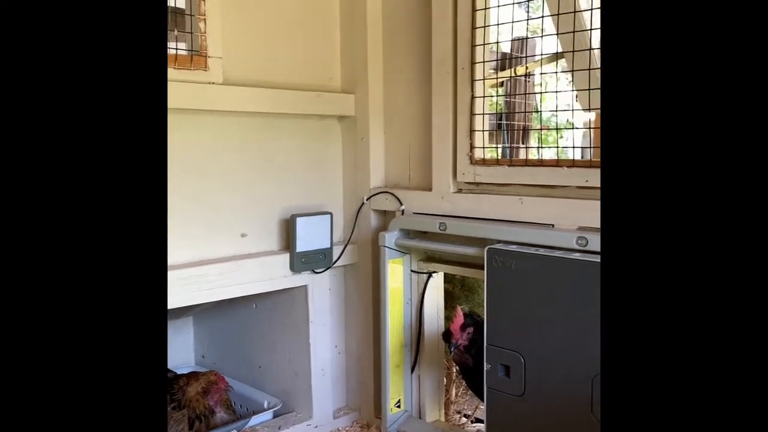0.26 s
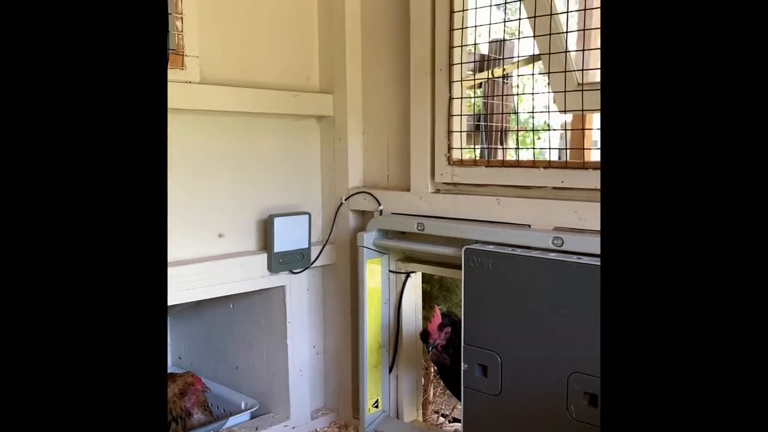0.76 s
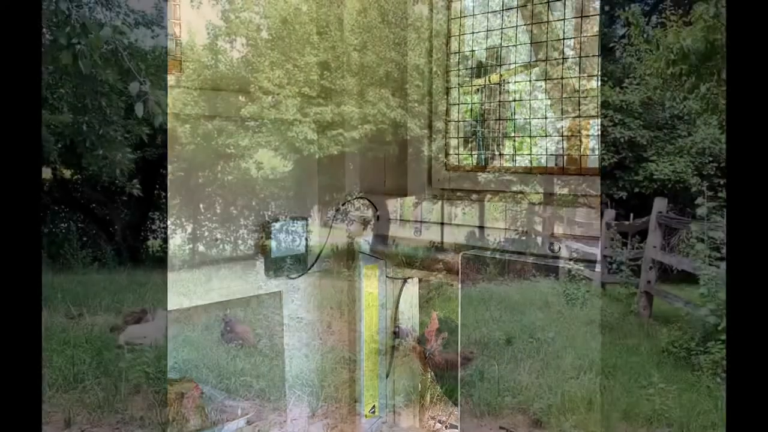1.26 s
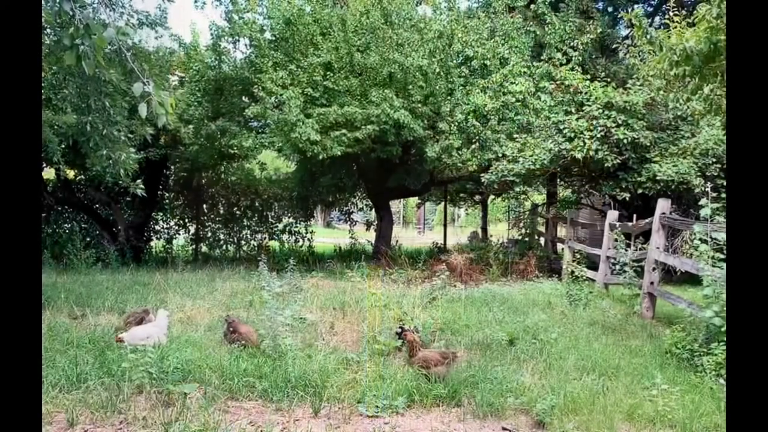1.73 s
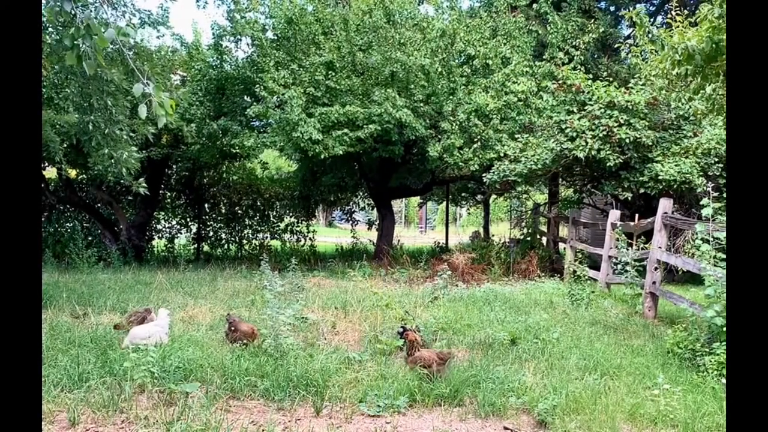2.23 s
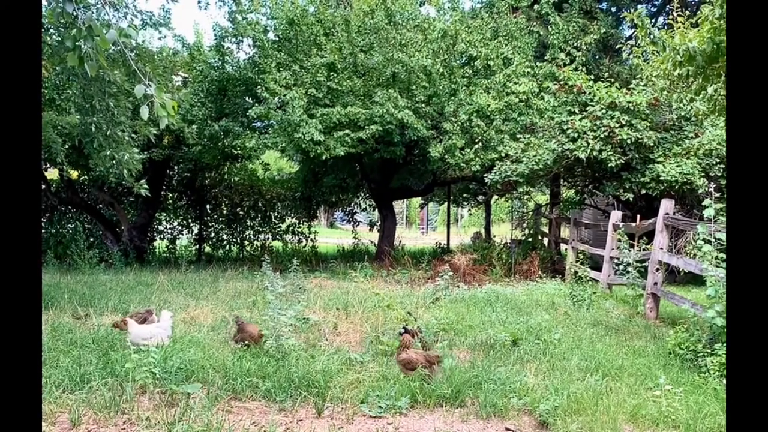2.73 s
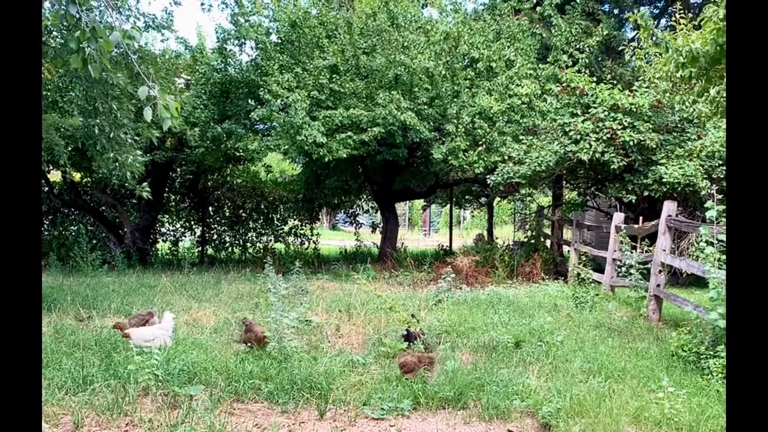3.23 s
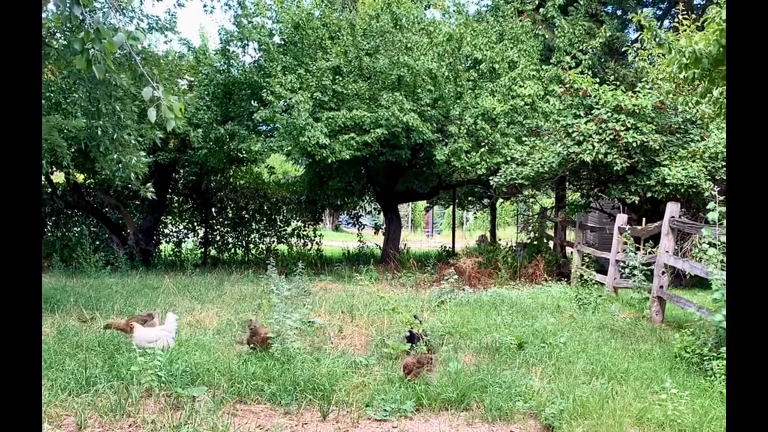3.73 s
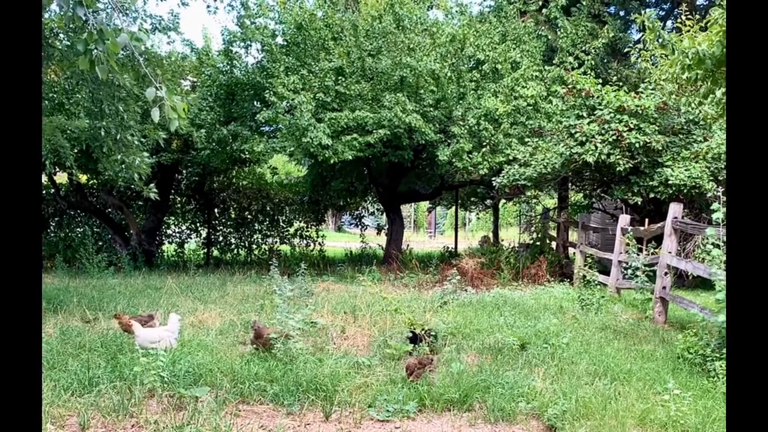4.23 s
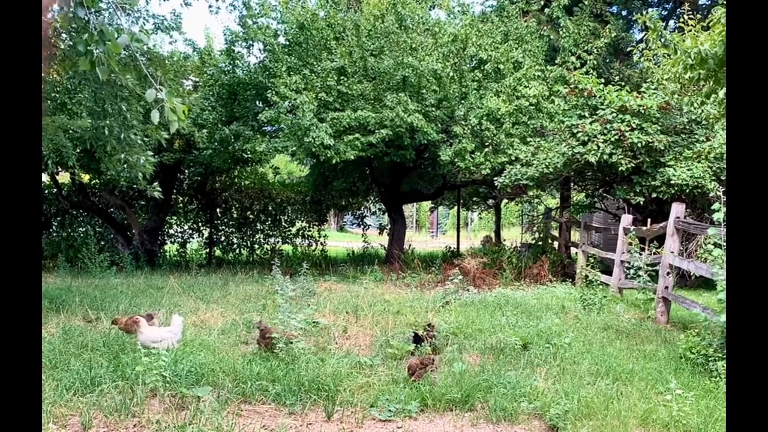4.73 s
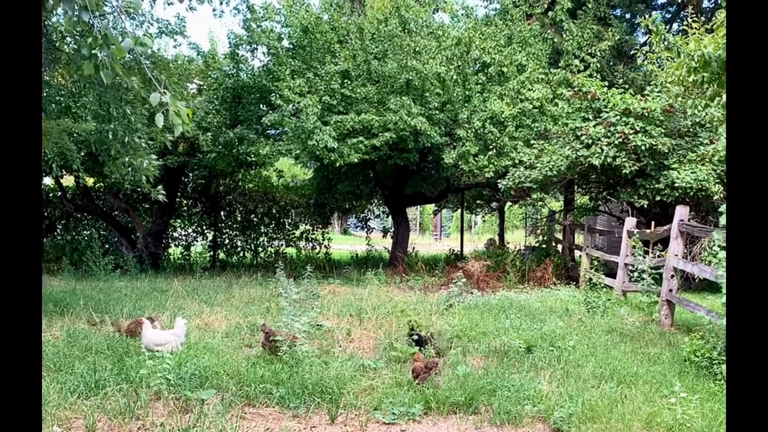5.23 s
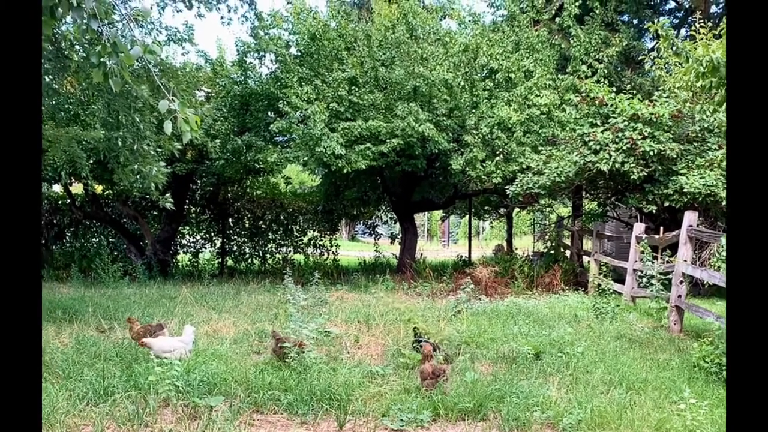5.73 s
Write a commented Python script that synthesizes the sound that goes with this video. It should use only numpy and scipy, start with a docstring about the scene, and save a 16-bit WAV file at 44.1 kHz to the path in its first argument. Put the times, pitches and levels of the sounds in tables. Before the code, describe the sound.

Outdoor birdsong with short echoes from trees: one central singer gives sharp, high down-slurs roughly twice a second, first dipping swoops, then stepped falls, then both mixed. Scattered whistles, clicks of chips and raspy calls surround it. A low drone and room tone fade early, replaced by gusty low wind, dull air bumps on the microphone and faint wide leaf hiss.

```python
"""A songbird repeats two down-slurred syllables in a tree-lined yard; other birds whistle, chip, twitter and rasp,
after a faint low hen murmur. Voices are gliding sines, shaped by a throat resonance or by pitch shake; trunks and
leaves scatter them into soft noise tails. The birds start softer, dip briefly near 0.65 s, then come up. A hen
house's low drone and noise room tone fade early. Wind is coloured noise, its bumps on the microphone decaying
low swings; air and foliage hiss faintly, as wide filtered noise."""
import sys
import numpy as np
from scipy import signal
from scipy.fft import rfft, irfft
from scipy.io import wavfile

SR = 44100
rng = np.random.default_rng(int(sys.argv[2]) if len(sys.argv) > 2 else 0)


def to_wav(sig):
    """Store sig (one row per channel, or 1-D mono) as 16-bit WAV at the path in sys.argv[1].

    Samples outside -1..1 are clipped; the rate is SR.
    """
    pcm = np.clip(np.atleast_2d(sig), -1, 1) * 32767
    pcm = np.round(pcm).astype(np.int16)
    wavfile.write(sys.argv[1], SR, pcm.T)  # frames by channels


N = 264114

# Turning points of the two syllables: t after onset/s, f/Hz
SWOOP_TURNS = [(-.005, 6050), (-.001, 6080), (.022, 3270), (.056, 3660), (.076, 3570), (.122, 2620),
               (.155, 2950)]
STEP_TURNS = [(-.004, 6400), (0, 6450), (.022, 4480), (.043, 4520), (.064, 3150), (.104, 2900)]
# Each singing: t/s, level at throat resonance/dB, length ratio, final fade/(dB per s of unstretched time)
SWOOPS_SUNG = [(0.106, -37, 0.97, 261), (0.549, -39, 0.91, 480), (1.028, -34, 0.96, 193),
               (1.443, -33.5, 0.98, 235), (3.063, -35, 0.94, 169), (3.829, -37, 0.96, 172),
               (4.234, -41, 0.9, 198)]
STEPS_SUNG = [(1.852, -35.5, 1.0, 250), (2.245, -35, 1.09, 250), (2.661, -37.5, 1.0, 250),
              (3.429, -38.5, 1.02, 250)]


def songbird(tag_after_s=.126, tag_s=.031, tag_hz=(3750, 4085, 3632), tag_db=-7.5):
    """Main singer: dipping swoops and stepped falls; each step gets a short tag that lifts, then falls."""
    swoops = syllables(SWOOP_TURNS, SWOOPS_SUNG, hold_s=0.092)
    steps = syllables(STEP_TURNS, STEPS_SUNG, hold_s=0.097)
    tag_rows = [(start + tag_after_s, tag_s, *tag_hz, db + tag_db) for start, db, *_ in STEPS_SUNG]
    # negative sag: level rises through the tag
    tags = notes(tag_rows, np.sqrt, blur=0.57, sag_db=-2, attack_s=0.018, release_s=0.0053)
    return perch(swoops + steps + tags)


def syllables(turns, sung, hold_s, attack_s=0.0039, waver=0.0073, throat_hz=3958, throat_q=7.65):
    """Syrinx eases between turning pitches; throat resonance sets loudness; effort fades after a hold."""
    out, drift = np.zeros(N), wander(110)
    for start, db, stretch, fade_db_per_s in sung:
        t = np.arange(turns[0][0], turns[-1][0], 1 / (SR * stretch))  # unstretched time
        hz = turns[0][1]
        for (t0, f0), (t1, f1) in zip(turns, turns[1:]):
            hz = hz + (f1 - f0) * ease(np.clip((t - t0) / (t1 - t0), 0, 1))
        hz = hz * (1 + waver * np.roll(drift, -int(start * SR))[:len(t)])
        throat = 1 / np.hypot(1, throat_q * (hz / throat_hz - throat_hz / hz))
        edges = signal.windows.tukey(len(t), 2 * attack_s * SR / len(t))
        effort = edges * undb(db - fade_db_per_s * np.maximum(t - hold_s, 0))
        add(out, start + t[0], tone(hz) * throat * effort)
    return out


# Echoes from trunks near the singer: delay/s, level/dB
TRUNK_ECHOES = [(.045, -11.5), (.088, -16)]


def perch(song, leaf_s=0.013, leaf_db=-12, leaf_hz=4400, trunk_hz=4300, smear_s=.022):
    """Leaves near the singer soon return smeared treble; two trunks answer later and duller."""
    out = song.copy()
    treble = signal.sosfilt(signal.butter(6, leaf_hz, "high", fs=SR, output="sos"), song)
    dull = signal.sosfilt(signal.butter(4, trunk_hz, "low", fs=SR, output="sos"), song)
    add(out, leaf_s, undb(leaf_db) * scattered(treble, 1, smear_s))
    for delay, db in TRUNK_ECHOES:
        add(out, delay, undb(db) * scattered(dull, 0.82, smear_s))
    return out


def notes(rows, bend, blur, sag_db, attack_s, release_s, rasp_depth=0.059, scatter_s=0.043, flutter_db=1):
    """Notes swell, bend through two or three pitches and fade; blur adds pitch shake and leaf scatter."""
    direct, shake = np.zeros(N), wander(500)
    for start, length, *pitches, db in rows:
        t = np.arange(-attack_s / 2, length + release_s / 2, 1 / SR)
        u = np.clip(t / length, 0, 1)
        order = len(pitches) - 1
        path = np.polyfit(np.linspace(0, 1, len(pitches)), pitches, order)
        hz = np.polyval(path, bend(u))
        hz = hz * (1 + rasp_depth * blur ** 2 * np.roll(shake, -int(start * SR))[:len(u)])
        edges = np.minimum(t / attack_s, (length - t) / release_s)
        effort = ease(np.clip(edges + .5, 0, 1))
        add(direct, start + t[0], tone(hz) * effort * undb(db - sag_db * u))
    return scattered(direct, blur, scatter_s) * undb(flutter_db * wander(160))


def straight(u):
    """Even progress through a note's pitches."""
    return u


# Whistles: t/s, length/s, onset f/Hz, held f/Hz, level/dB; the third row is no other bird's whistle but a faint
# held tone near 3.6 kHz that lingers as the birds come back after the dip
WHISTLE_NOTES = [(.003, 0.047, 1500, 1530, -53.5), (.527, 0.036, 2114, 2294, -50.5),
                 (.695, 0.058, 3690, 3607, -52), (2.602, 0.015, 2480, 2570, -54),
                 (2.619, 0.055, 2593, 2667, -41.5), (2.675, 0.125, 2660, 2639, -47.5),
                 (3.135, 0.074, 3800, 3954, -40.5), (3.213, 0.085, 4547, 4450, -45.5),
                 (3.3, 0.081, 4480, 4390, -53.5), (3.361, 0.053, 3245, 2723, -44),
                 (3.497, 0.079, 3450, 3280, -44), (3.567, 0.063, 3220, 2563, -46),
                 (3.996, 0.048, 3590, 3838, -38), (4.118, 0.021, 3240, 2690, -47),
                 (4.226, 0.11, 4294, 3766, -42), (4.514, 0.015, 3960, 4070, -38.5),
                 (4.529, 0.087, 3966, 3020, -43.5), (4.784, 0.038, 4480, 4450, -48.5),
                 (4.808, 0.047, 4120, 3854, -39), (4.872, 0.03, 2174, 2060, -66.5),
                 (4.905, 0.038, 3520, 3180, -43.5), (4.938, 0.039, 3170, 3340, -45),
                 (5.218, 0.034, 2664, 2568, -49)]


def whistles(settle_share=.2):
    """Clear tones slide exponentially onto a pitch and hold it."""
    return notes(WHISTLE_NOTES, lambda u: 1 - np.exp(-u / settle_share), blur=0.42, sag_db=3.0,
                 attack_s=0.012, release_s=0.016, rasp_depth=0.019, flutter_db=.5)


# Slurs: t/s, length/s, start f/Hz, middle f/Hz, end f/Hz, level/dB
SLUR_NOTES = [(.48, 0.022, 3067, 3180, 3180, -59.5), (.513, .018, 2813, 2303, 2140, -54),
              (.896, 0.03, 4200, 3820, 3710, -51), (1.125, 0.037, 6400, 6100, 6360, -59.5),
              (1.198, 0.046, 5670, 5570, 5100, -51.5), (4.36, 0.033, 5170, 4830, 4670, -64),
              (4.466, 0.037, 5520, 5740, 5650, -63.5), (5.074, .041, 1890, 2620, 3060, -49)]


def slurs():
    """Soft tones follow a parabola through three pitches, rising in level."""
    return notes(SLUR_NOTES, straight, blur=0.71, sag_db=-1.5, attack_s=0.024, release_s=0.014,
                 rasp_depth=0.03, scatter_s=0.066, flutter_db=-0.5)


# Chips: t/s, length/s, start f/Hz, end f/Hz, level/dB
CHIP_NOTES = [(.741, 0.011, 2380, 2140, -44.5), (.755, 0.008, 2280, 1730, -53),
              (.934, 0.012, 4170, 3370, -53), (1.494, 0.011, 1880, 3200, -53.5),
              (1.587, 0.015, 3700, 3980, -39.5), (1.605, 0.019, 5300, 6840, -62),
              (1.671, 0.007, 3900, 3640, -44), (1.692, 0.017, 3190, 4050, -42.5),
              (1.712, 0.016, 4360, 2800, -59), (1.774, 0.016, 4250, 2540, -47),
              (1.791, 0.015, 2250, 2410, -54), (2.058, 0.026, 3590, 2846, -46.5),
              (2.121, 0.0058, 2240, 3120, -52), (2.143, 0.008, 2380, 2150, -58),
              (2.148, 0.025, 4120, 2875, -46.5), (2.823, 0.033, 3240, 3040, -48.5),
              (2.863, 0.015, 3137, 2866, -41), (2.927, 0.015, 1987, 2420, -43.5),
              (3.418, 0.01, 2683, 2290, -42), (3.56, .026, 4350, 3570, -58),
              (3.632, 0.047, 2593, 3076, -42.5), (4.069, 0.032, 3790, 3870, -44),
              (4.097, .02, 3920, 4200, -43.5), (4.5, 0.015, 5300, 3900, -48)]


def chips():
    """Quick tones sweep up or down and stop sharply."""
    return notes(CHIP_NOTES, straight, blur=0.77, sag_db=4.5, attack_s=0.0074, release_s=0.0019,
                 rasp_depth=0.014, flutter_db=3.0)


# Twitters: t/s, length/s, start f/Hz, end f/Hz, level/dB
TWITTER_NOTES = [(1.535, .03, 5800, 5230, -56), (1.536, .034, 5080, 4320, -50.5),
                 (1.63, .014, 5880, 5660, -51.5), (1.63, 0.031, 5300, 4550, -49),
                 (1.668, .014, 4900, 4400, -53), (1.698, .02, 4850, 4100, -47),
                 (1.722, .022, 4900, 4240, -48.5), (1.749, .028, 4600, 4060, -45),
                 (4.708, .03, 6100, 4680, -54.5)]


def twitters():
    """Thin falling tones, some in two voices at once."""
    return notes(TWITTER_NOTES, straight, blur=.68, sag_db=2, attack_s=.006, release_s=.006,
                 rasp_depth=.015, scatter_s=.03, flutter_db=1)


# A faint low hen murmur (first row), then raspy gliding calls: t/s, length/s, start f/Hz, end f/Hz, level/dB
MURMUR_AND_RASP_NOTES = [(.01, 0.087, 757, 704, -58), (.71, 0.031, 2550, 2340, -55),
                         (2.363, 0.041, 2253, 1848, -48.5), (2.585, 0.027, 6140, 6270, -64.5),
                         (2.585, 0.016, 3730, 4050, -57), (5.885, 0.068, 3830, 3140, -62),
                         (5.9, 0.062, 2286, 2080, -74)]


def murmur_and_rasps():
    """Random pitch shake roughens a low hen murmur and the gliding calls after it."""
    return notes(MURMUR_AND_RASP_NOTES, straight, blur=0.76, sag_db=2.5, attack_s=0.014, release_s=0.0061,
                 rasp_depth=0.059, scatter_s=0.02, flutter_db=4.0)


# Warbled notes: t/s, length/s, start f/Hz, end f/Hz, warble rate/Hz, final warble depth/Hz, level/dB
WARBLE_NOTES = [(3.933, 0.0588, 3153, 3510, 66, 130, -45.5), (5.113, 0.112, 2897, 2398, 37.83, 180, -48.5)]


def warbles(throb_db=3):
    """Pitch swings quickly and ever wider about a glide, loudest at the bottom of each swing."""
    out = np.zeros(N)
    for start, length, first_hz, last_hz, rate_hz, depth_hz, db in WARBLE_NOTES:
        t = np.arange(int(length * SR)) / SR
        swing = np.cos(2 * np.pi * rate_hz * t)
        hz = np.linspace(first_hz, last_hz, len(t)) + depth_hz * swing * np.sqrt(t / length)
        level = undb(db - throb_db * swing * t / length)
        add(out, start, tone(hz) * signal.windows.tukey(len(t), .1) * level)
    return scattered(out, blur=0.55, scatter_s=0.03)


# Thin far squeal: t/s, f/Hz, level/dB
SQUEAL_PATH = [(.922, 900, -70), (.94, 860, -56), (.972, 759, -53.5), (1.03, 742, -52.5), (1.06, 800, -82)]
# Harmonics from the fundamental up: relative level/dB
SQUEAL_HARMONICS_DB = [-16, 2.5, -24, 2.5, 2, 7.5, -2, -3]


def squeal(t, rough=0.03, hoarse=0.26):
    """A hoarse falling call: harmonics of a shaky pitch, each frayed in amplitude, blurred by leaves."""
    hz, db = curves(SQUEAL_PATH, t)
    hz = hz * (1 + rough * wander(380))
    stack = np.zeros(N)
    for k, harmonic_db in enumerate(SQUEAL_HARMONICS_DB, 1):
        stack += undb(harmonic_db) * tone(k * hz) * (1 + hoarse * wander(810))
    sounding = (t > SQUEAL_PATH[0][0]) * (t < SQUEAL_PATH[-1][0])
    return scattered(unit(stack) * undb(db) * sounding, blur=0.57, scatter_s=0.021)


def trees(song, near_db=-13, near_t60=0.34, far_db=-10, far_t60=1.0, build_s=0.038, side_db=-21):
    """Near-trunk echoes die quickly; those from deeper foliage build up and linger, flickering."""
    t = np.arange(int(1.5 * SR)) / SR
    tails = []
    for _ in range(2):
        # cubing makes the near echoes sparse
        near = rng.standard_normal(len(t)) ** 3 * undb(-60 * t / near_t60) * (t > .008)
        build = 1 - np.exp(-(t / build_s) ** 2)
        far = rng.standard_normal(len(t)) * undb(-60 * t / far_t60) * build
        response = (undb(near_db) * unit(near) + undb(far_db) * unit(far)) / np.sqrt(len(t))
        flicker = undb(1.5 * wander(45))
        tails.append(signal.fftconvolve(song, response)[:N] * flicker)
    return wide(tails[0], undb(side_db) * tails[1])


def scattered(direct, blur, scatter_s):
    """Leaves on the way break part of a sound into a short, grainy smear."""
    share = np.clip(blur, 0, 1) ** 2
    t = np.arange(SR // 8) / SR
    scatter = unit(rng.standard_normal(len(t)) * np.exp(-t / scatter_s)) / np.sqrt(len(t))
    return np.sqrt(1 - share ** 2) * direct + share * signal.fftconvolve(direct, scatter)[:N]


# Rustle spectrum: f/Hz, level/dB
RUSTLE_SPECTRUM = [(700, -10), (1500, 5), (2300, -6), (3000, 4), (3650, 12), (4200, 3), (4700, -9),
                   (7000, -26.5)]


def rustle(t, db=-54.0, start_s=0.687, swell_s=0.074):
    """A short soft wash of noise swells under the first raspy call and fades."""
    u = np.maximum(t - start_s, 0) / swell_s
    swell = 2 * u / (1 + u ** 2) * np.exp(-u / 10)
    return noise(RUSTLE_SPECTRUM) * undb(db) * swell


# Soft bumps of air on the microphone: t/s, f/Hz, swing peak level/dB, hardness/dB
AIR_BUMPS = [(1.824, 88, -35, -11), (1.903, 80, -31, -2.5), (2.313, 82.5, -36.5, -31),
             (2.383, 76.6, -35.5, -9.5), (2.717, 59, -24, -17.5), (2.924, 69, -36.5, -26),
             (3.021, 65, -32, -19), (3.074, 87, -35, -11.5), (3.232, 99, -31.5, -25),
             (3.318, 66.5, -30, -20), (3.382, 69, -32, -18), (3.423, 80, -34, -11), (3.867, 82, -32.5, -26),
             (4.028, 85, -30, -14), (4.525, 69, -38, -16), (4.58, 70.4, -26.5, -16.5),
             (5.076, 99, -33.5, -6)]


def bumps(swell_cycles=0.55, sag=0.21, knock_hz=135, knock_s=0.0055, tick_db=-14):
    """Each puff is a few slow pressure swings that swell, sink in pitch and die, with a knock near the crest."""
    out, t = np.zeros(N), np.arange(SR // 5) / SR
    for when, hz, db, hard_db in AIR_BUMPS:
        swell_s = swell_cycles / hz
        u, lead_s = t / swell_s, 1.65 * swell_s
        envelope = (u * np.exp(1 - u / 2) / 2) ** 2
        sinking_hz = hz * (1 + sag * (2 * np.exp(-u / 2) - 1))
        swing = envelope * tone(sinking_hz) / np.sqrt(2)
        late = t - lead_s
        phase = 2 * np.pi * knock_hz * late
        # the harder the knock, the more of its octave it carries
        knock = np.sin(phase) + undb(tick_db + hard_db) * np.sin(2 * phase)
        knock *= 2 * np.minimum(u, 1) ** 2 * np.exp(-(late / knock_s) ** 2)
        add(out, when - lead_s, undb(db) * (swing + undb(hard_db) * knock))
    return out


# Wind: t/s, level before trim and gusts/dB
WIND_LEVEL = [(0.9, -59), (1.37, -58.5), (1.83, -51), (2.33, -54), (2.49, -49), (3.28, -50), (3.65, -54.5),
              (3.98, -48.5), (4.33, -57), (4.76, -47), (5.28, -52), (5.99, -50)]
# Wind spectrum: f/Hz, level/dB
WIND_SPECTRUM = [(18, -35), (30, -14.5), (50, 5.5), (65, 2), (100, 1.5), (150, -11.5), (210, -19),
                 (400, -23.5), (800, -36.5)]


def wind(t, trim_db=1, gust_db=2):
    """Gusty low noise that takes over as the drone fades."""
    db, = curves(WIND_LEVEL, t)
    takeover_db = np.interp(t, [.9, 1.5], [-8, 0])
    return noise(WIND_SPECTRUM) * undb(db + trim_db + gust_db * wander(23.0) + takeover_db)


# Hen-house drone: t/s, level before flutter/dB
DRONE_LEVEL = [(0, -43), (.42, -47.5), (.6, -47.5), (.85, -45), (1.5, -61.5), (1.9, -89)]


def drone(t, hz=56.7, waver=0.038, upper_hz=146, upper_db=-19, left_db=1.5):
    """A wavering low hum with a weak upper resonance, a little to the left."""
    db, = curves(DRONE_LEVEL, t)
    hum = tone(hz * (1 + waver * wander(9.2)))
    upper = undb(upper_db) * tone(upper_hz * (1 + waver * wander(29)))
    balance = undb(np.array([[left_db], [-left_db]]) / 2)
    return (hum + upper) * undb(db + 3.06 * wander(25)) * balance


# Hollow room tone of the hen house: f/Hz, level/dB
COOP_SPECTRUM = [(60, 1), (140, 14.5), (250, 5.5), (500, 2), (800, -2), (1400, -5.5), (2500, -15),
                 (7000, -48), (11300, -12.5), (15500, -46)]
# Room tone: t/s, mid level/dB
COOP_LEVEL = [(0, -56), (.12, -65), (.3, -64), (.9, -66.5), (1.4, -70), (1.9, -101)]


def coop(t, side_db=2):
    """Diffuse room tone, wide noise that fades with the drone."""
    db, = curves(COOP_LEVEL, t)
    return wide(noise(COOP_SPECTRUM), undb(side_db) * noise(COOP_SPECTRUM)) * undb(db)


# Distant air: t/s, level before trim/dB
AIR_LEVEL = [(0, -66.5), (.65, -100), (.74, -69), (1.4, -67.5), (3.8, -71), (5.99, -68)]
# Air spectrum: f/Hz, level/dB
AIR_SPECTRUM = [(80, -29), (200, -44), (350, 0), (550, 2.5), (900, 4.5), (1400, 0.5), (2500, -1.5),
                (5000, -39), (9000, -57)]


def air(t, trim_db=3, side_db=-1):
    """Wide noise of distant air."""
    db, = curves(AIR_LEVEL, t)
    return wide(noise(AIR_SPECTRUM), undb(side_db) * noise(AIR_SPECTRUM)) * undb(db + trim_db)


# Leaves: t/s, mid level before flicker/dB
LEAF_LEVEL = [(0, -75.5), (1.3, -74.5), (2, -69), (5.3, -64.5), (5.99, -61.5)]
# Leaf spectra, middle and side: f/Hz, level/dB
LEAF_MID_SPECTRUM = [(1200, -30), (2500, -2), (3600, 1), (5200, -3.5), (6800, -1.5), (8300, -20.5),
                     (11300, -6), (13000, -32.5), (15500, -19)]
LEAF_SIDE_SPECTRUM = [(1200, -23), (2500, 2.5), (5200, 5), (7600, -0.5), (8800, 4), (10000, -9),
                      (12000, -18), (15000, -11)]


def leaves(t, side_db=-1, flicker_db=2.15):
    """Fine, slightly flickering hiss of foliage on all sides."""
    db, = curves(LEAF_LEVEL, t)
    hiss = wide(noise(LEAF_MID_SPECTRUM), undb(side_db) * noise(LEAF_SIDE_SPECTRUM))
    return hiss * undb(db + flicker_db * wander(12.0))


def undb(db):
    """Decibels to gain."""
    return 10 ** (np.asarray(db) / 20)


def unit(x):
    """Scale to rms 1."""
    return x / np.sqrt(np.mean(x ** 2))


def ease(u):
    """A smooth move from 0 to 1 that starts and ends at rest."""
    return (1 - np.cos(np.pi * u)) / 2


def curves(rows, t):
    """Each column of a table, joined by straight lines; end values hold."""
    s, *columns = np.transpose(rows)
    return [np.interp(t, s, c) for c in columns]


def add(track, start, sound):
    """Mix a sound in at a start time in s."""
    i = max(int(start * SR), 0)
    track[i:i + len(sound)] += sound[:max(N - i, 0)]


def wander(rate_hz):
    """Random curve of rms 1, smoothed by a Gaussian low-pass at the rate."""
    f = np.arange(N // 2 + 1) * SR / N
    return unit(irfft(rfft(rng.standard_normal(N)) * np.exp(-.5 * (f / rate_hz) ** 2), N))


def noise(colour):
    """Noise of rms 1 shaped by a spectrum table, on a log frequency axis."""
    hz, db = np.transpose(colour)
    f = np.arange(1, N // 2 + 2) * SR / N
    shape = undb(np.interp(np.log(f), np.log(hz), db, left=-90, right=-90))
    return unit(irfft(rfft(rng.standard_normal(N)) * shape, N))


def tone(hz):
    """A sine of rms 1 that follows a pitch curve."""
    return np.sqrt(2) * np.sin(2 * np.pi * np.cumsum(hz) / SR)


def wide(mid, side):
    """Middle and side to left and right."""
    return mid + np.array([side, -side])


# Gain on all birds and their echoes, soft start, brief dip, then up: t/s, level/dB
BIRD_GAIN = [(.625, -9), (.645, -28), (.668, -21), (.685, 2.5)]


def scene():
    """Birds straight ahead, their echoes around them, wind on the microphone."""
    t = np.arange(N) / SR
    other_birds = whistles() + slurs() + chips() + twitters() + murmur_and_rasps() + warbles() + squeal(t)
    song = songbird() + other_birds
    gain_db, = curves(BIRD_GAIN, t)
    birds = (song + trees(song)) * undb(gain_db)
    background = wind(t) + drone(t) + coop(t) + air(t) + leaves(t)
    return birds + rustle(t) + bumps() + background


def record(dry, low_hz=28, top_hz=15700):
    """The microphone thins the deepest rumble; the recorder cuts the top."""
    thinned = signal.sosfilt(signal.butter(2, low_hz, "high", fs=SR, output="sos"), dry)
    return signal.sosfilt(signal.ellip(8, .2, 70, top_hz, fs=SR, output="sos"), thinned)


dry = scene()
out = record(dry)
to_wav(out)
```